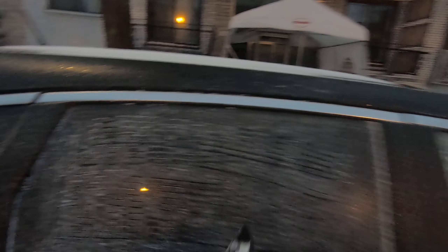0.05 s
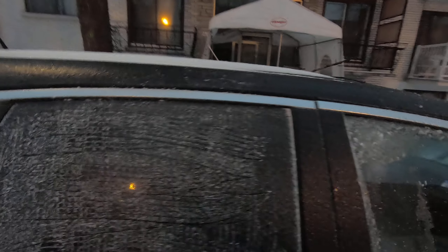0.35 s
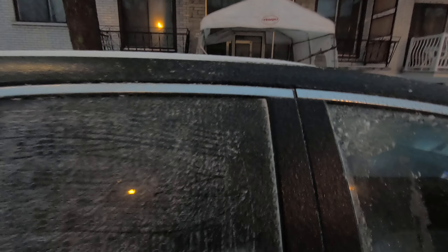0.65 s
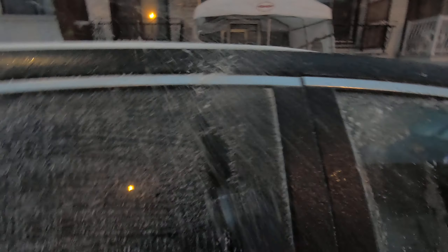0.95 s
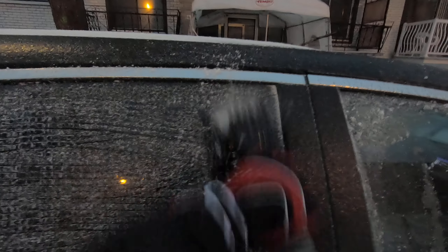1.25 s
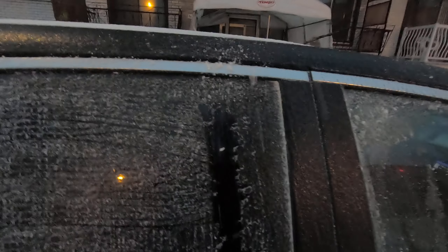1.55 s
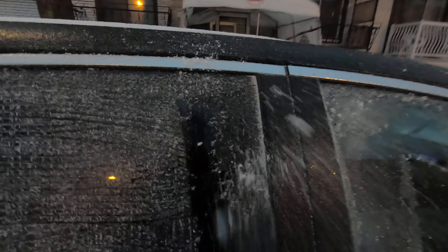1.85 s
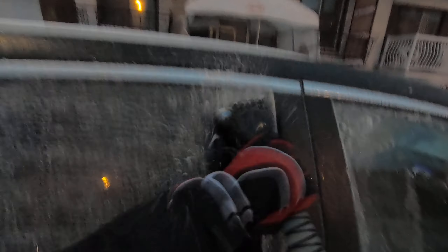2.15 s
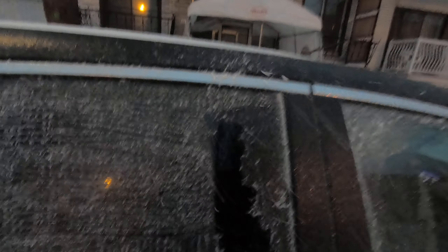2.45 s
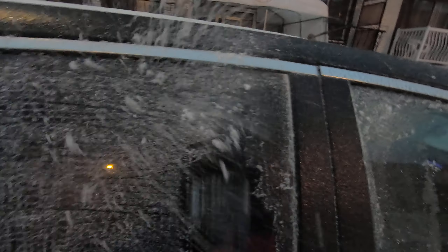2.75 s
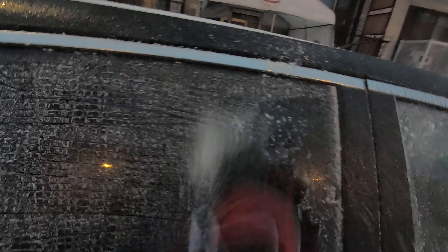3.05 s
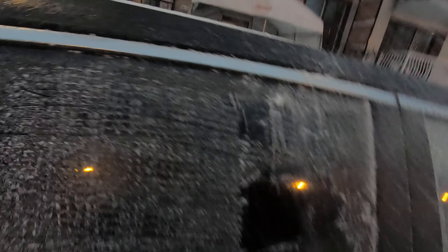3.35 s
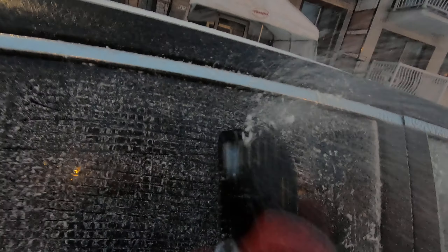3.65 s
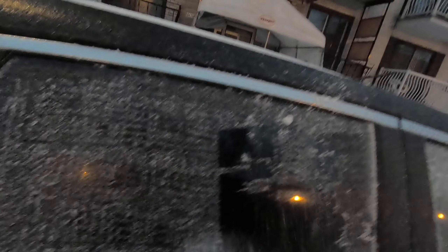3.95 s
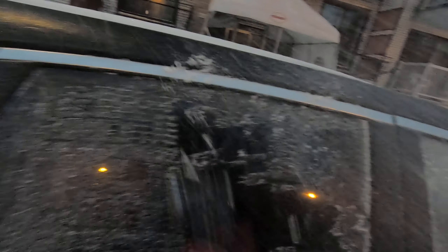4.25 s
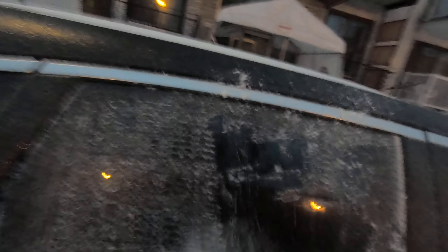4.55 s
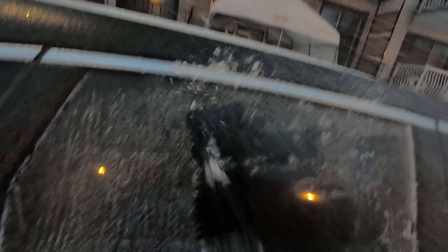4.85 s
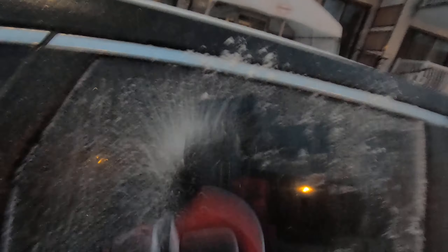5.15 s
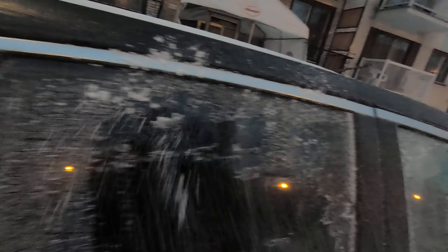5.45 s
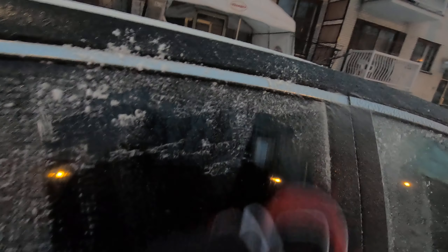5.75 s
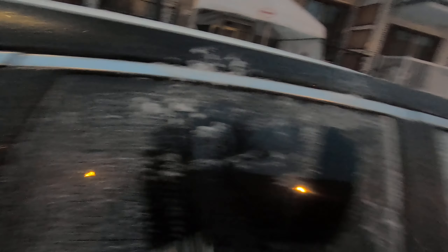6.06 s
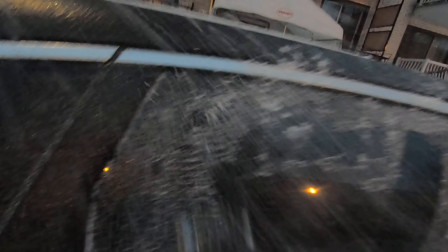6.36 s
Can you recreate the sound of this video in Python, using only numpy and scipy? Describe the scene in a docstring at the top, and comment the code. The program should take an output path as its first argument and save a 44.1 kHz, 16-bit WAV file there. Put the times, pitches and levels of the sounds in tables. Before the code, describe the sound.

Close, gritty scraping of ice from a car's side window outdoors, with light blade knocks and a low rumble from the glass.

```python
"""Scraping frost off a car window.

A plastic scraper works a side window, close by, outdoors. Hard pushes break the ice in brittle
fractures that make the pane rumble; lighter pulls rasp back with the blade ringing at its resonances.
Between strokes the blade knocks on the glass and loose chips tick. The car's body and the house
fronts reflect these sounds faintly; an engine idles under the wash of the street."""
import sys
import numpy as np
from scipy import signal
from scipy.fft import rfft, irfft, next_fast_len
from scipy.io import wavfile
from scipy.ndimage import map_coordinates

SR = 44100
rng = np.random.default_rng(int(sys.argv[2]) if len(sys.argv) > 2 else 0)


def store_wav(level_fs):
    """Save 16-bit WAV to argv[1]."""
    pcm = np.round(np.clip(np.atleast_2d(level_fs), -1, 1) * 32767)
    wavfile.write(sys.argv[1], SR, pcm.T.astype(np.int16))


N = 286650

# Forward strokes, levels before each layer's gain: start t/s, length/s, speeding up/s, slowing down/s,
# rasp level/dB, swell/dB, pane level/dB; spray, low ring and high ring level/dB re rasp;
# fraction of the stroke at which the blade rocks over; groan level/dB re rasp, groan f/Hz
PUSH_STROKES = [ (.626, 0.2856, 0.068, 0.06, -22.5, -2, -15, -11.5, 2, -2, 0.456, -4.5, 560),
                (1.151, 0.23, 0.043, 0.0604, -24, -3, -18.5, -11.5, 2, -4, 0.36, -3, 590),
                (1.621, .21, 0.023, 0.0862, -20.5, 1.5, -13.5, -12.5, -0.5, -9.5, 0.44, -6.5, 670),
                (2.041, 0.071, 0.023, 0.039, -24, 0, -15, -13, -12, -4.5, 0.66, -7, 604),
                (2.095, 0.17, 0.0236, 0.054, -26, -10, -20.5, -8.5, 6.5, -7, .57, -3.5, 716),
                (2.484, 0.2657, 0.0332, 0.086, -21, -3, -15.5, -14, -4.5, -3, 0.36, -8.5, 740),
                (2.961, .268, 0.041, 0.059, -22.5, -3, -16.5, -10.5, 0, -4.5, 0.35, -6, 676),
                (3.464, 0.24, 0.034, 0.0704, -22.5, -3.5, -16, -10.5, 2, -11, 0.36, -2.5, 681),
                (3.964, 0.24, 0.0132, 0.0483, -23, -7, -18, -11.5, 1.5, -6, 0.32, -5.5, 660),
                (4.558, 0.23, .004, .049, -22.5, -4.5, -18, -11.5, 1, -3, 0.34, -4, 623),
                (5.036, 0.26, 0.014, 0.064, -23.5, 0, -16, -12.5, 0.5, -2.5, 0.35, -4.5, 756),
                (5.622, 0.13, 0.0118, 0.0497, -28.5, 0, -18, -10.5, 1.5, 3, .25, 3, 600),
                (6.031, 0.11, 0.027, 0.074, -22, -0.5, -16.5, -11.5, -9, -8, 0.67, -15.5, 550),
                (6.122, 0.19, 0.047, 0.06, -23, -7.5, -18.5, -8.5, 2.5, -6, 0.294, -1.5, 720), ]
# Response of the pane to a jolt: f/Hz, level/dB
PANE_SPECTRUM = [(20, -26), (48, -2), (75, -1), (98, -1), (122, -2.5), (150, -3.5), (195, -6), (280, -7),
                 (400, -10.5), (520, -17.5), (800, -31.5), (2000, -81.5)]


def pushes():
    """Brittle fracture: the edge digs in, pressed flat, and breaks off slabs of ice."""
    spectrum = [(220, -18.5), (420, 4), (560, -7), (850, -1.5), (1350, -1.5), (1700, -2), (2250, -7),
                (3300, -3.5), (4200, -7.5), (5100, -6), (6200, -14), (8800, -24.5), (11000, -33),
                (16000, -60)]  # rasp of the edge: f/Hz, level/dB
    modes = [(3150, 1600), (3590, 130)]  # resonances of the flattened blade: f/Hz, bandwidth/Hz
    # each layer along a stroke: drift/dB, mid-stroke bulge/dB, loss at rest/dB, loss before biting/dB
    law = {"rasp": (-1, 0.6, 23, -0.5), "pane": (-4.5, 2.5, 9.5, 5), "spray": (0.529, 0.56, 1, 5.8),
           "groan": (11.5, -5, -2, 5)}
    out = np.zeros((2, N))
    for row in PUSH_STROKES:
        add(out, *stroke(row, law, spectrum, modes, rock=-1.2, crack_rate=230, spread_db=1.5,
                         life_s=0.0029, gains_db=(-1, -0.5, -4.5, -4.5, -2)))
    return out


def pulls():
    """Light damping: the loosely held blade rings as it skates back over the frost."""
    pull_strokes = [ (.366, 0.1405, 0.004, .012, -37.5, 0, -27, -14, 3, 1, .15, 0, 724),
                    (.494, .145, .004, 0.043, -33, -12, -27.5, -18, 2, -7, .2, 1.5, 813),
                    (.91, 0.26, 0.072, .064, -24.5, 4, -27, -10.5, -5, 2.5, .6, -10, 930),
                    (1.374, 0.233, 0.068, .035, -24, 8, -27.5, -11, -1, 2, .5, -16, 930),
                    (1.867, 0.17, 0.0874, .052, -21.5, -1, -24, -14, -8, 1.5, 0.4, -10, 940),
                    (2.256, 0.19, .065, .05, -25, 1.5, -30, -12.5, -5, -6, 0.5, -10, 940),
                    (2.451, 0.043, 0.02, .026, -22.5, -.5, -31, -20, -11, -8, 0.28, -2, 1110),
                    (2.761, 0.053, 0.0081, 0.032, -33, -2.5, -28.5, -18, -9, -7, .6, 1, 890),
                    (2.881, 0.073, 0.053, 0.0123, -28, 1, -31, -13, -7.5, -3, 0.65, -4.5, 880),
                    (3.226, 0.1242, 0.0564, 0.02, -26, 7.5, -26.5, -9, 1, -3.5, 1, -26, 1150),
                    (3.698, 0.093, 0.048, 0.0096, -32.5, 6.5, -26.5, -5.5, 8, -10, .74, -8.5, 1030),
                    (3.792, 0.13, .035, 0.047, -24, -1, -25, -10, -15.5, -6, .6, 1.5, 1050),
                    (3.92, 0.035, .021, .018, -25, -3, -25.5, -23, -4.5, -10, .5, 0, 1300),
                    (4.215, 0.33, 0.062, .058, -27.5, -6, -30.5, -7, .5, -10, 0.47, -6, 1000),
                    (4.499, 0.0485, .0085, .008, -38, -6, -28, -23, -13, -9, .5, -5, 1100),
                    (4.819, .212, 0.01, 0.023, -25, 1.5, -26, -9.5, 6.5, -13.5, 0.28, -3.5, 1074),
                    (5.973, 0.067, 0.028, 0.041, -25, 0, -26.5, -16, -12, 0.5, .2, 2, 1135),
                    (6.303, 0.265, 0.053, .02, -22.5, 3, -26.5, -9, 1, -3, 0.42, -10, 1013), ]  # return strokes and short drags: columns as in PUSH_STROKES
    spectrum = [(250, -23.5), (500, -2.5), (1000, -2), (1650, -2.5), (2350, -5), (2900, -0.5), (3700, -1),
                (4200, -8), (5000, -3), (6100, -13.5), (8700, -16.5), (11000, -39), (16000, -48)]  # rasp of the edge: f/Hz, level/dB
    modes = [(3150, 130), (3775, 110)]  # resonances of the loosely held blade: f/Hz, bandwidth/Hz
    # each layer along a stroke: drift/dB, mid-stroke bulge/dB, loss at rest/dB, loss before biting/dB
    law = {"rasp": (-1, 1, 20, 0.5), "pane": (2.5, 1, 0.5, -1.7), "spray": (-2.3, 2.55, -1, -1),
           "groan": (9, -6, -3, 1)}
    out = np.zeros((2, N))
    for row in pull_strokes:
        add(out, *stroke(row, law, spectrum, modes, rock=0.98, crack_rate=240, spread_db=2,
                         life_s=0.00234, gains_db=(-0.45, -2, -6, -5, -3.5)))
    return out


def stroke(row, law, spectrum, modes, rock, crack_rate, spread_db, life_s, gains_db):
    """Common excitation: each break of the ice rasps, sprays, rings the blade and jolts the pane."""
    start, fade, levels, groan_hz = arm_motion(row, law, rock)
    rasp_db, pane_db, spray_db, groan_db, *mode_db = levels
    edge_gain, spray_gain, blade_gain, groan_gain, pane_gain = amp(gains_db)
    strength = amp(rasp_db.max() + 25)  # 1 for a full stroke; lighter ones break the ice less often
    cracks = fractures(len(fade), crack_rate * strength ** .8, spread_db, life_s)
    edge = edge_gain * heard(moving_contact(rasp(cracks), depth_db=3.2), spectrum)
    spray = spray_gain * amp(spray_db) * ice_spray(cracks)
    blade = blade_gain * sum(amp(db) * ring(rasp(cracks), hz, width_hz)
                             for (hz, width_hz), db in zip(modes, mode_db))
    # the glass under the edge groans at a pitch that slides with the contact point
    groan = groan_gain * amp(groan_db) * ring(rasp(cracks), groan_hz, width_hz=210)
    jolts = moving_contact(rasp(cracks, crack_share=0.33), depth_db=3.5, per_octave=22.7)
    rumble = pane_gain * amp(pane_db) * heard(jolts, PANE_SPECTRUM)
    return start, fade * (amp(rasp_db) * (edge + blade + groan + spray) + rumble)


def arm_motion(row, law, rock):
    """Modulation: the arm's speed and force set the levels, its position the pitch of the groan."""
    start, length, rise, fall, rasp_db, swell_db, pane_db, spray_db = row[:8]
    low_db, high_db, rock_at, groan_db, groan_hz = row[8:]
    ease_power, bite_s, snag_db, arc_octaves = 1.67, 0.037, 0.88, 0.245
    rock_width, released_db = 0.13, -12.5  # fraction of a stroke; drop of the mode the blade leaves
    t = np.arange(int(length * SR)) / SR
    fade = np.clip(np.minimum(t, length - t) / .003, 0, 1)
    starting = np.clip(1 - t / rise, 0, 1) ** ease_power
    stopping = np.clip(1 - (length - t) / fall, 0, 1) ** ease_power
    biting = np.exp(-t / bite_s)
    place = t / length - .5
    arch = np.cos(np.pi * place) - 2 / np.pi
    # the edge snags on thick ice and slips over thin
    force_db = swell_db * place + snag_db * wobble(44.5)[:len(t)]
    change = {layer: drift * place + bulge * arch - at_rest * (starting + stopping) - unbitten * biting
              for layer, (drift, bulge, at_rest, unbitten) in law.items()}
    # the blade rocks from its low mode to its high one (rock > 0) or the other way (rock < 0)
    high_share = .5 + .5 * np.tanh(rock * (t / length - rock_at) / rock_width)
    levels = [rasp_db + force_db + change["rasp"], pane_db + force_db + change["pane"],
              spray_db + change["spray"], groan_db + change["groan"],
              low_db + released_db * high_share, high_db + released_db * (1 - high_share)]
    return start, fade, levels, groan_hz * 2 ** (arc_octaves * arch)


def fractures(n, rate, spread_db, life_s):
    """Poisson process: an envelope of rms 1 from uneven cracks whose power decays exponentially."""
    breaks = rng.random(n) < rate / SR
    size = amp(spread_db * np.clip(rng.standard_normal(n), -2, 2))
    decay = np.exp(-1 / (life_s * SR))
    envelope = np.sqrt(signal.lfilter([1], [1, -decay], breaks * size ** 2))
    return envelope / rms(envelope)


def grit(n, rate):
    """Shot noise: tiny crystals break at the same random moments in mid and side."""
    return (rng.random(n) < rate / SR) * rng.standard_normal((2, n))


def rasp(cracks, crack_share=.64):
    """Addition of powers: big cracks stand over the even crushing of fine frost."""
    return grit(len(cracks), rate=11000) * np.sqrt(crack_share * cracks ** 2 + 1 - crack_share)


def ice_spray(cracks):
    """Modulated shot noise: ice dust hisses with each crack."""
    spectrum = [(3500, -44), (6000, -2), (7500, -1), (8800, 1.5), (10000, -5.5), (11200, -15), (13000, -17),
                (16000, -34)]  # hiss of the dust: f/Hz, level/dB
    return heard(rasp(cracks, crack_share=0.686), spectrum)


def moving_contact(x, depth_db, rate=16, per_octave=9):
    """Modal coupling: as the contact point moves, the glass's modes swell and sink independently."""
    hz, t, spectra = signal.stft(x, SR, nperseg=512, noverlap=384)
    grid = np.meshgrid(np.log2(1 + hz / 900) * per_octave + 1, t * rate + 1, indexing="ij")
    field = map_coordinates(rng.standard_normal((64, 24)), grid, mode="mirror")
    coupling = amp(depth_db * np.clip(field, -1.8, 1.8))
    return signal.istft(spectra * coupling, SR, nperseg=512, noverlap=384)[1][:, :x.shape[1]]


def knocks():
    """Impact excitation: the blade lands, skids through a few crystals, rings and thumps the pane."""
    # landings and catches: t/s, relative level/dB, thud offset/dB, ring f/Hz, ring offset/dB, skid/s
    landings = [(0.496, -22.5, 3, 3590, -11.5, 0.0084), (0.529, -19, -5, 3680, -4, 0.0084),
                (1.635, -20, -18, 3370, 4, 0.011), (2.06, -11, 5.5, 3340, -6, 0.0069),
                (2.451, -9.5, -12.5, 3330, -19, 0.0109), (2.679, -18.5, 9, 2990, -6, 0.016),
                (2.797, -12, -24, 3100, -18, 0.0049), (2.856, -10.5, -7, 3600, -3, 0.017),
                (3.391, -12.5, -2.5, 3455, -5.5, 0.014), (3.437, -11.5, -2.5, 2670, -22, 0.0153),
                (3.479, -13, -3, 3400, -10, 0.01), (3.763, -10, -11, 3450, -5, 0.0075),
                (3.975, -11, -27, 3274, -11, 0.0073), (4.218, -23.5, -7, 3107, 13, 0.0059),
                (4.239, -18, -14, 3070, 1, 0.0035), (4.446, -15, -3, 3470, -14, 0.01),
                (4.562, -16.5, 11.5, 3360, -10, 0.0029), (4.791, -15, -10.5, 2970, -2, 0.0024),
                (4.835, -30, -9, 3200, -4, 0.0103), (5.08, -5, -12.5, 3620, -3, 0.0093),
                (5.38, -9.5, -8.5, 3100, -15, 0.013), (5.41, -28, -12, 2930, -1.5, 0.0042),
                (5.568, -10, -6, 3435, -21, 0.01), (5.631, -16, -13, 3300, -4, 0.0065),
                (5.646, -8.5, 5.5, 3070, -8.5, 0.0091), (5.75, -22.5, -7, 3080, -15, 0.0046),
                (5.799, -13, -6, 2480, -4.5, 0.0038), (6.075, -12.5, 6.5, 3320, -3, 0.0035),
                (6.143, -13.5, -16.5, 4000, -7, 0.006)]
    spectrum = [(200, -29), (600, -1.5), (1000, 4), (1900, -5.5), (2600, -1), (3400, 1), (4300, -9),
                (5200, -8), (6300, -9), (8800, -11), (11000, -24), (16000, -40.5)]  # clack of plastic on glass: f/Hz, level/dB
    out, t = np.zeros((2, N)), np.arange(SR // 8) / SR
    for start, db, thud_db, ring_hz, ring_db, skid in landings:
        # the load peaks a moment after first touch, then the plastic dies away
        contact = np.exp(-((t - .3 * skid) / (.7 * skid)) ** 2) + amp(-16 - 60 * t / .085)
        drive = moving_contact(grit(len(t), rate=9000), depth_db=3.5) * contact
        clack = heard(drive, spectrum) + amp(ring_db) * ring(drive, ring_hz, width_hz=270)
        thud = heard(rng.standard_normal((2, len(t))) * contact, PANE_SPECTRUM)
        add(out, start, amp(db - 24) * clack + amp(db + thud_db - 21) * thud)
    return out


def chips():
    """Brief impacts are broadband: flung ice ticks on glass and roof, singly and as a faint patter."""
    landings = [(0.1287, -23), (0.1356, -30.5), (0.165, -32), (0.2109, -40), (1.3505, -11), (2.508, -18.5),
                (2.7666, -37), (3.377, -23.5), (3.4561, -13), (4.4983, -24), (4.5386, -38.5), (5.4244, -29),
                (5.474, -29), (5.5158, -22.5), (5.8238, -21), (5.856, -23), (5.9322, -22.5), (5.961, -22)]  # single chips: t/s, relative level/dB
    spectrum = [(600, -7.5), (2000, 2.5), (3500, 3.5), (6000, -4), (9000, 1), (11000, -13), (16000, -27)]  # tick of a chip: f/Hz, level/dB
    out, t = np.zeros((2, N)), np.arange(SR // 25) / SR
    decay = amp(-60 * t / 0.0109) + amp(-28 - 60 * t / .04)
    for start, db in landings:
        tick = rng.standard_normal((2, len(t))) * decay
        add(out, start, amp(db - 23.5) * heard(tick, spectrum))
    # each push throws up crumbs that come down over the next moments
    push_ends = np.array([start + length for start, length, *_ in PUSH_STROKES])
    since = np.arange(N) / SR - push_ends[:, None]
    shower = np.sum((since > 0) * np.exp(-abs(since) / 0.26), axis=0)
    patter = fractures(N, rate=120, spread_db=3, life_s=.002) * rng.standard_normal((2, N))
    return out + amp(-51) * shower * heard(patter, spectrum)


def pane_boom(x):
    """Free vibration: the pane's lowest mode rings on after each stroke."""
    return amp(0.5) * resonate(x, hz=75.2, width_hz=8.3)


def reflections(x, t60):
    """Reverberation: the car's body and the house fronts return a short, decaying tail."""
    t = np.arange(SR // 3) / SR
    tail = rng.standard_normal((2, len(t))) * amp(-60 * t / t60) * (t > .004)
    return signal.fftconvolve(x, tail / np.linalg.norm(tail[0]), axes=1)[:, :N]


def street():
    """Superposition: an idling engine's wavering partials lie under the dull noise of the street."""
    partials = [(43.1, -66), (91.5, -44.5), (156.1, -51.5)]  # engine hum: f/Hz, level/dB
    spectrum = [(12, -26), (20, 1), (55, -8.5), (81, -3.5), (172, -14), (216, -18.5), (542, -27.5),
                (1910, -33.5), (2390, -38), (3630, -39.5), (5680, -49.5), (7950, -46.5), (16000, -75)]  # wash of the street: f/Hz, level/dB
    t = np.arange(N) / SR
    hum = sum(amp(db + 1.2 * wobble(5.6)) * np.sqrt(2) * np.sin(2 * np.pi * hz * t + wobble(6.8))
              for hz, db in partials)
    wash = amp(-36) * heard(rng.standard_normal((2, N)), spectrum)
    return wash + np.outer([1, 0], hum)


def resonate(x, hz, width_hz):
    """Damped resonator of gain 1 whose centre frequency may glide."""
    turn = np.exp(2j * np.pi * np.cumsum(hz * np.ones(x.shape[1])) / SR)
    pole = np.exp(-np.pi * width_hz / SR)
    return 2 * np.real(turn * signal.lfilter([1 - pole], [1, -pole], x / turn))


def ring(x, hz, width_hz):
    """Forced resonance with trimmed skirts; the mid has rms 1."""
    low, high = np.min(hz), np.max(hz)
    return heard(resonate(x, hz, width_hz), [(low / 2, -18), (low, 0), (high, 0), (high * 2, -18)])


def heard(x, spectrum):
    """Spectral shaping of mid and side, narrower in the bass than in the treble; the mid has rms 1."""
    width = [(60, -17), (280, -19.5), (500, -13), (800, -7.5), (1400, -9), (2200, -5), (3000, -12.5),
             (4300, -13.5), (5200, -10), (6300, -2.5), (12000, -0.5)]  # stereo width: f/Hz, side minus mid level/dB
    y = coloured(x, spectrum)
    return np.vstack([y[:1], coloured(y[1:], width)]) / rms(y[0])


def coloured(x, spectrum, size=4096):
    """Minimum-phase filter: folding the cepstrum makes the (f/Hz, level/dB) shape causal."""
    gain = amp(along(spectrum, np.fft.rfftfreq(size, 1 / SR)))
    cepstrum = irfft(np.log(gain))
    cepstrum[1:size // 2] *= 2
    cepstrum[size // 2 + 1:] = 0
    response = irfft(np.exp(rfft(cepstrum)))[:size // 2]
    return signal.fftconvolve(x, response[None], axes=1)[:, :x.shape[1]]


def along(points, hz):
    """Interpolation of (f/Hz, value) points on a logarithmic frequency axis."""
    f, values = np.transpose(points)
    return np.interp(np.log(hz + 1), np.log(f + 1), values)


def wobble(rate):
    """Slow random fluctuation, with rate knots a second."""
    return np.interp(np.arange(N) * rate / SR, np.arange(200), rng.standard_normal(200))


def amp(db):
    """Amplitude ratio of a level in decibels."""
    return 10 ** (np.asarray(db) / 20)


def rms(x):
    """Root-mean-square amplitude."""
    return np.sqrt(np.mean(x ** 2) + 1e-20)


def add(track, start_s, sound):
    """Superposition of a sound on the track."""
    part = track[:, max(round(start_s * SR), 0):][:, :sound.shape[1]]
    part += sound[:, :part.shape[1]]


def scene():
    """Superposition of all sources as mid and side; sum and difference give left and right."""
    scraping = pushes() + pulls() + knocks() + chips()
    mid, side = scraping + pane_boom(scraping) + amp(-13.5) * reflections(scraping, t60=0.11) + street()
    return np.array([mid + side, mid - side])


def record(dry):
    """Soft saturation rounds the peaks; two microphone ports colour the sound and limit its band."""
    imbalance = [(60, 2.5), (110, -1.5), (200, -0.5), (380, -1.0), (700, -2.5), (1290, -2.5), (2380, -1.0),
                 (4400, -2), (8120, -0.5), (15000, -2.5)]  # response of the ports: f/Hz, left minus right level/dB
    ceiling, top_hz = .85, 16000
    size = next_fast_len(N + SR // 4)
    hz = np.fft.rfftfreq(size, 1 / SR)
    rounded = dry / (1 + (dry / ceiling) ** 6) ** (1 / 6)
    ports = amp(np.outer([.5, -.5], along(imbalance, hz)))
    return irfft(rfft(rounded, size) * ports * (hz < top_hz), size)[:, :N]


dry = scene()
out = record(dry)
store_wav(out)
```